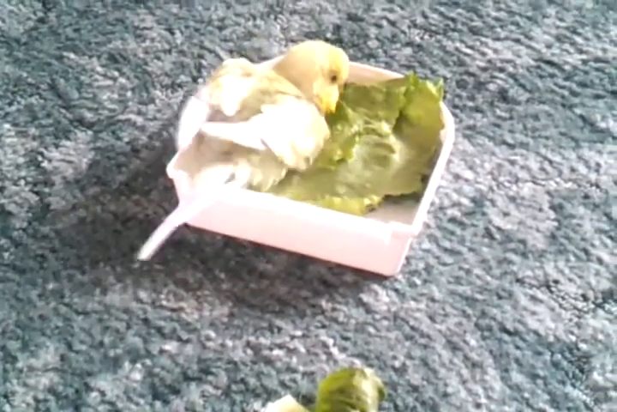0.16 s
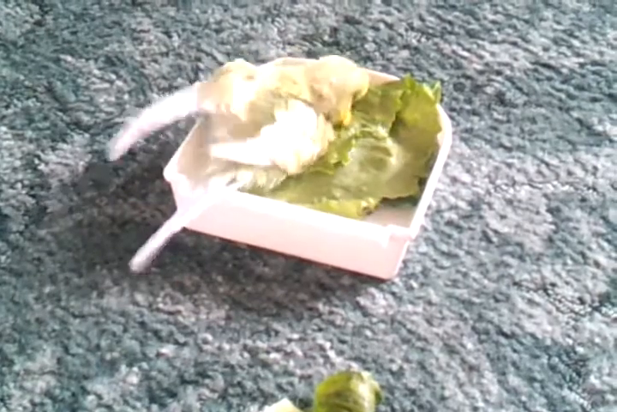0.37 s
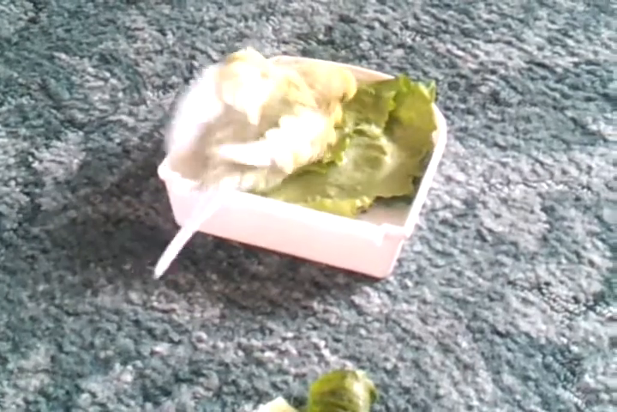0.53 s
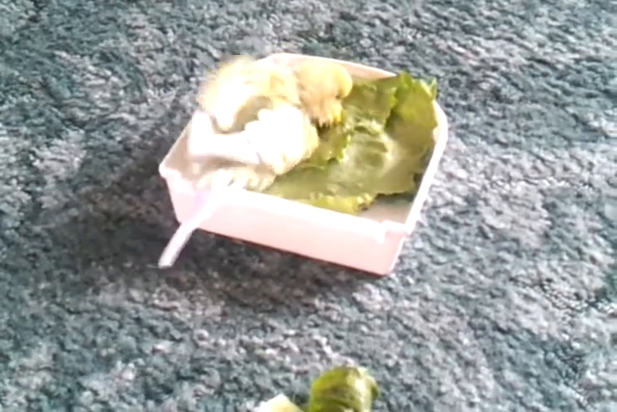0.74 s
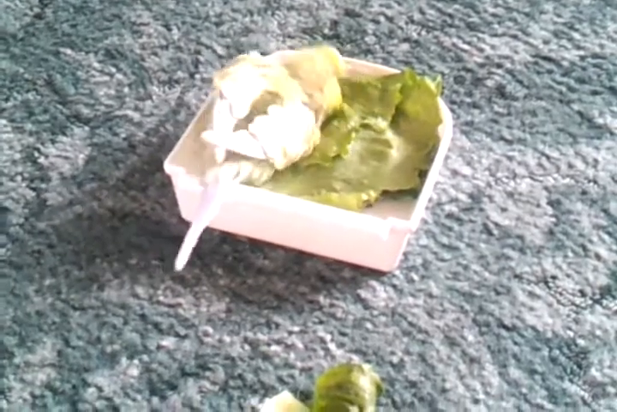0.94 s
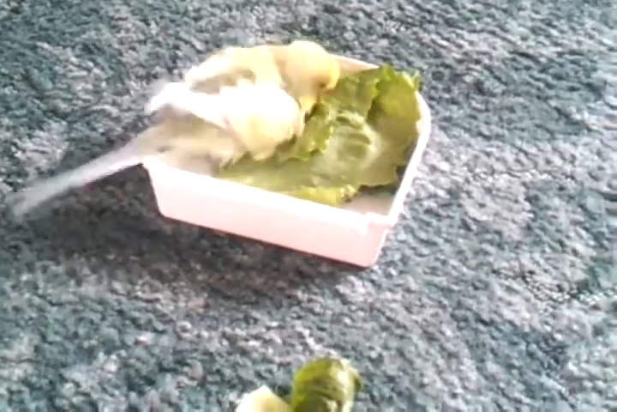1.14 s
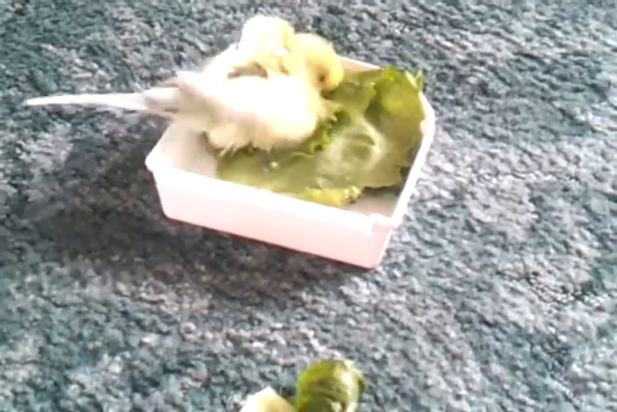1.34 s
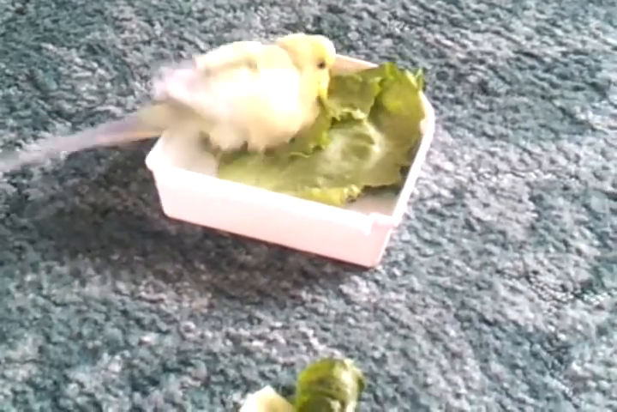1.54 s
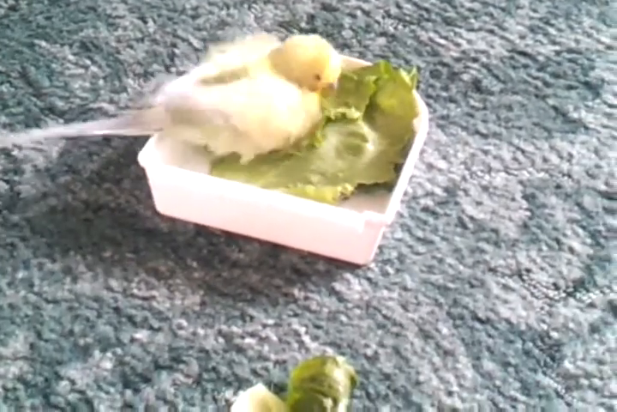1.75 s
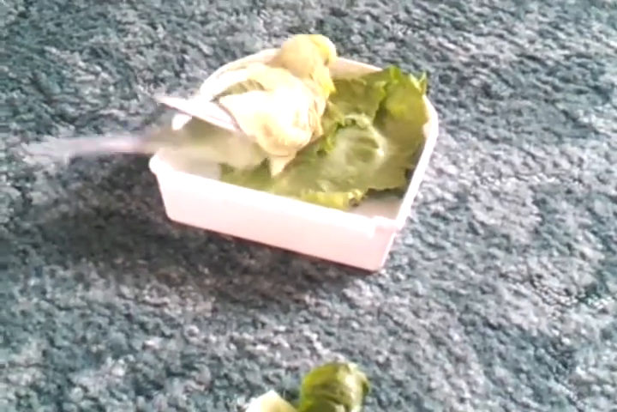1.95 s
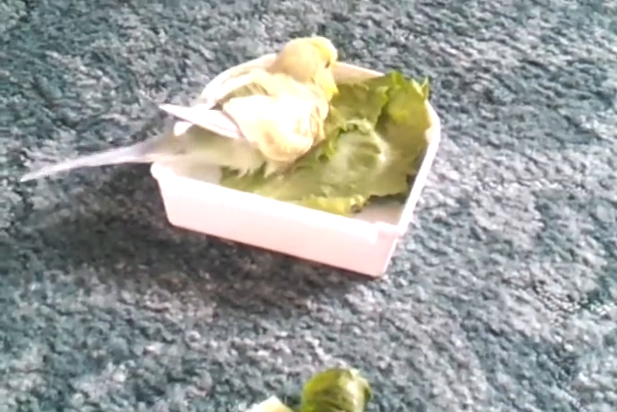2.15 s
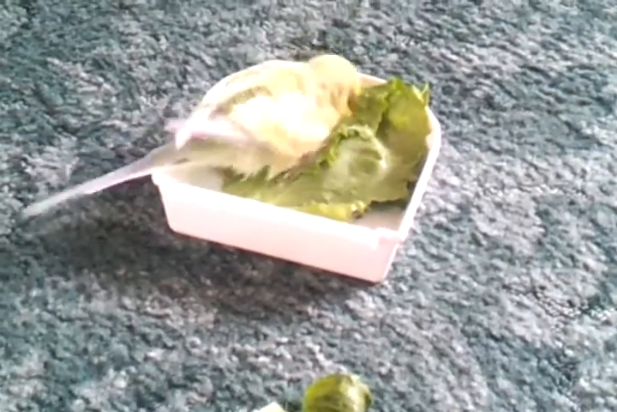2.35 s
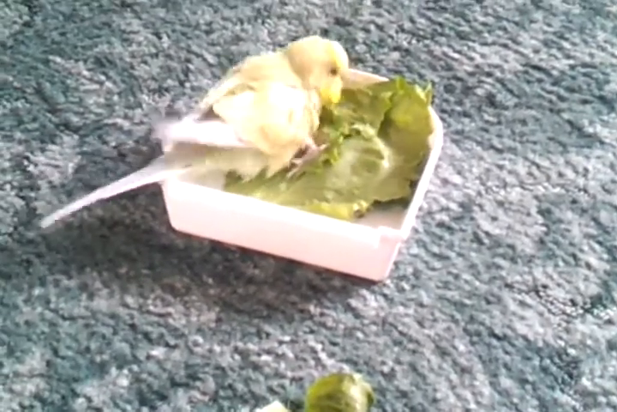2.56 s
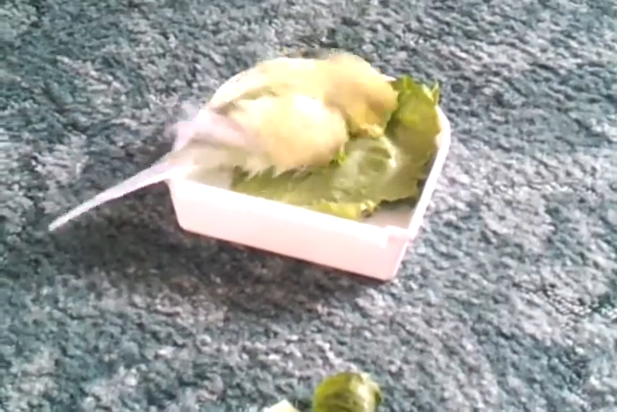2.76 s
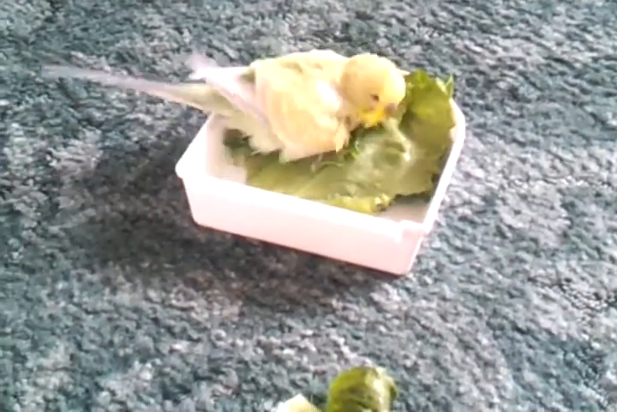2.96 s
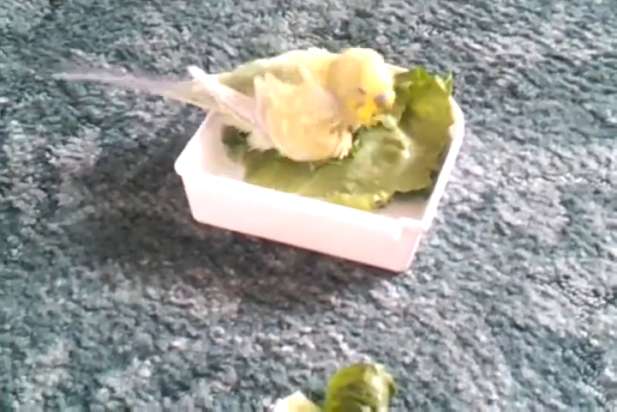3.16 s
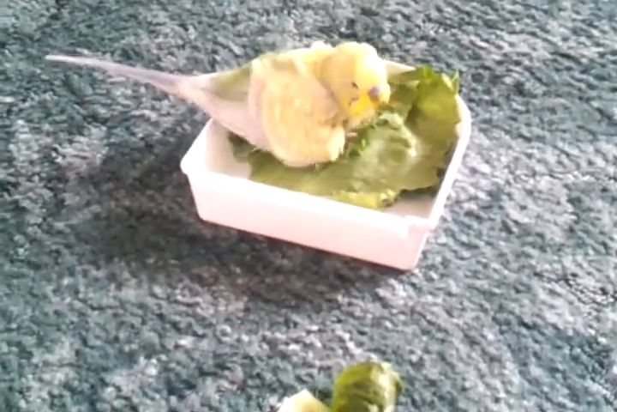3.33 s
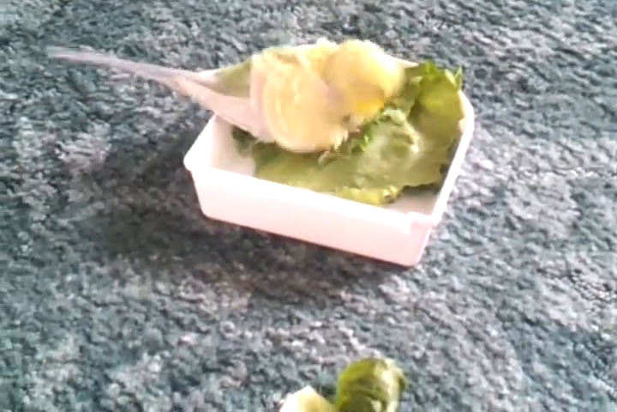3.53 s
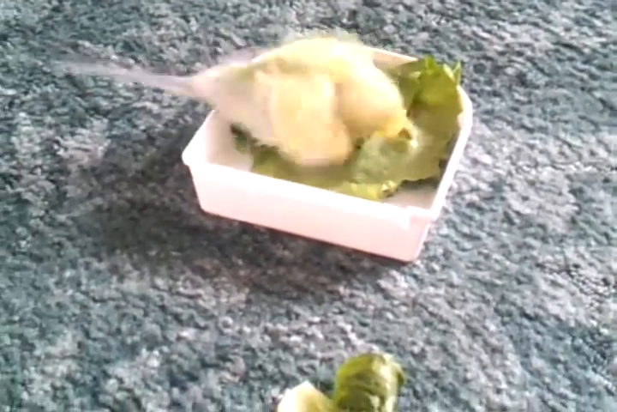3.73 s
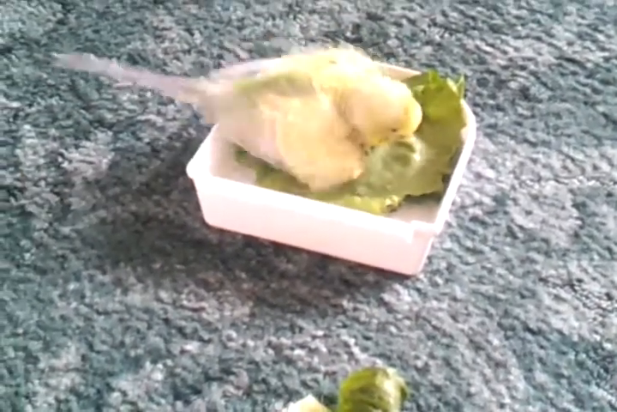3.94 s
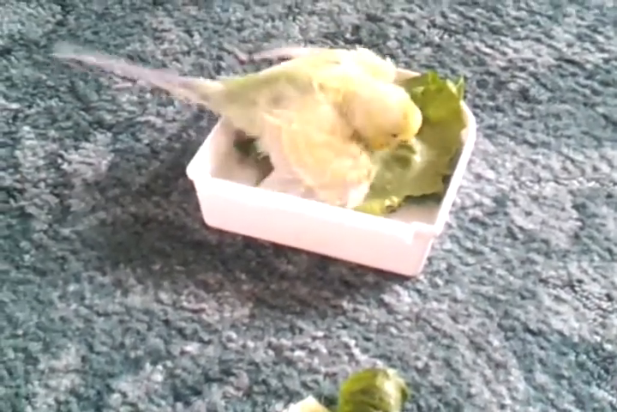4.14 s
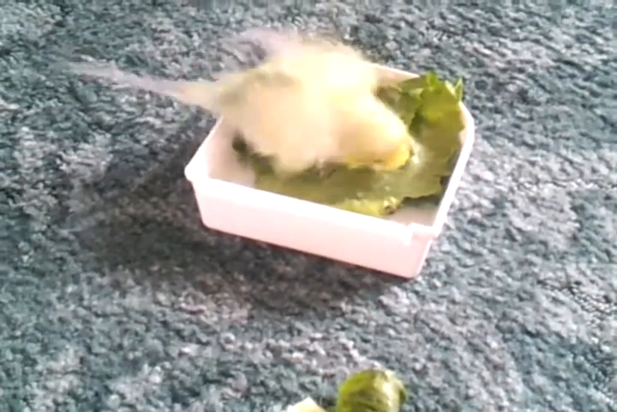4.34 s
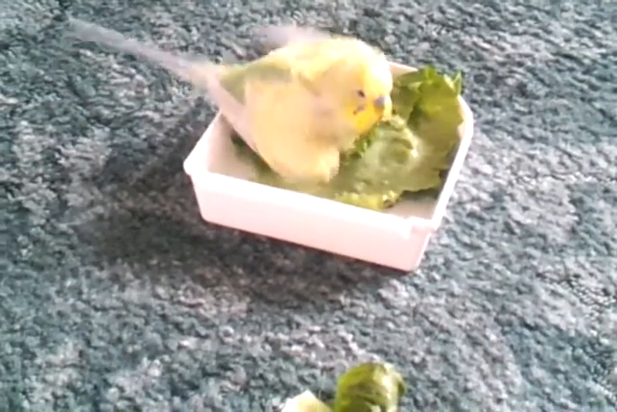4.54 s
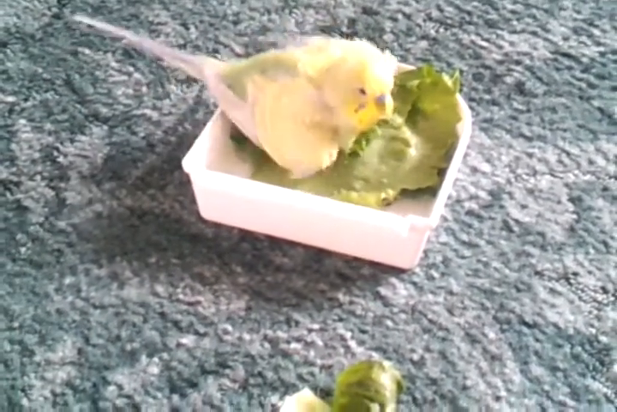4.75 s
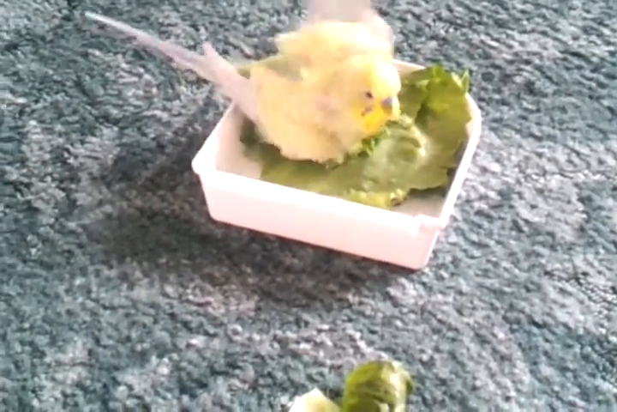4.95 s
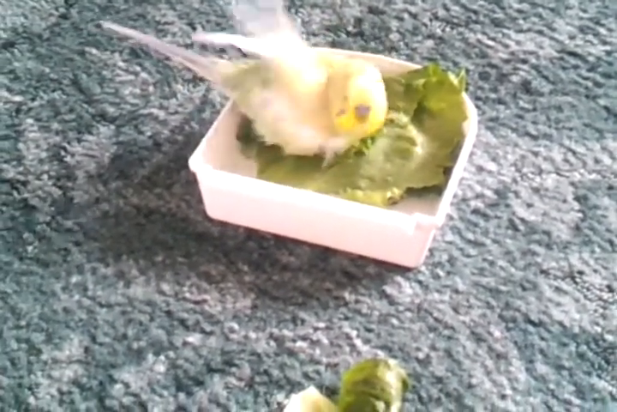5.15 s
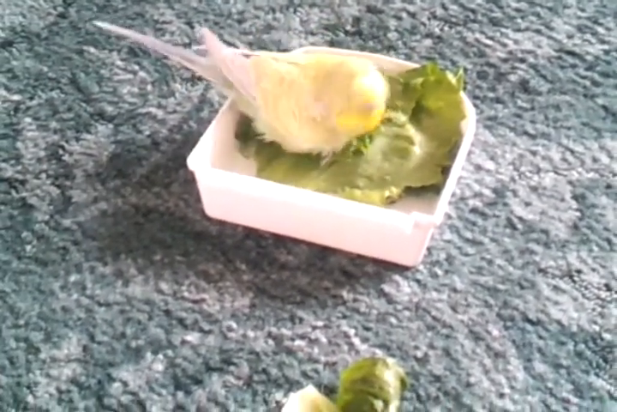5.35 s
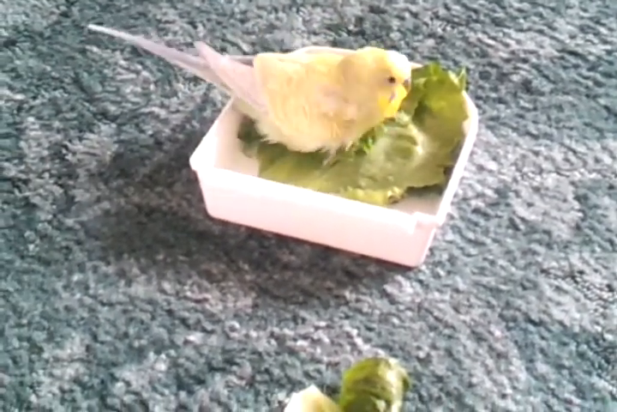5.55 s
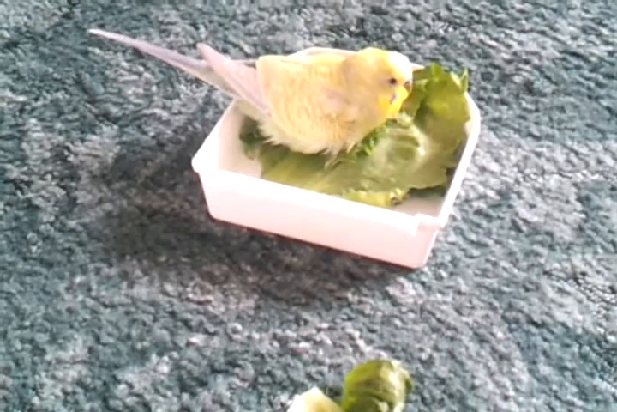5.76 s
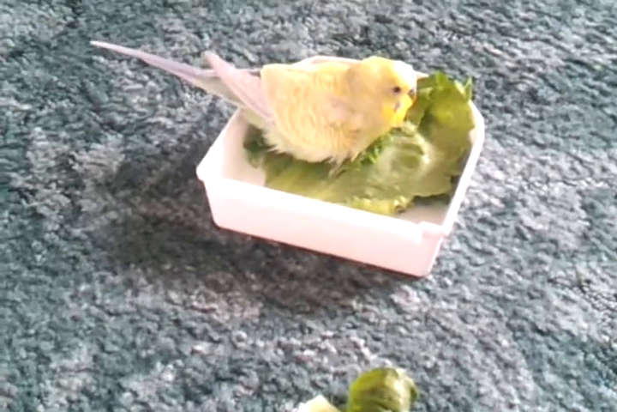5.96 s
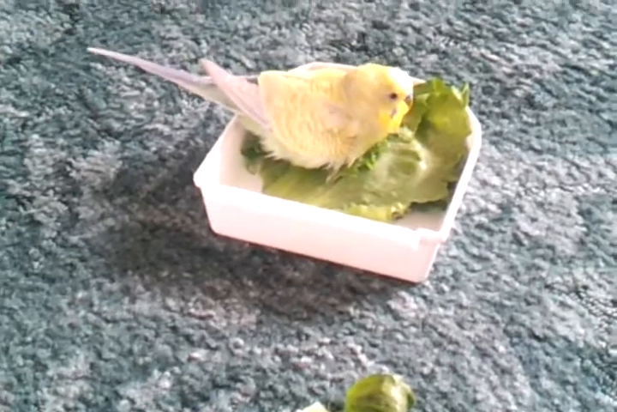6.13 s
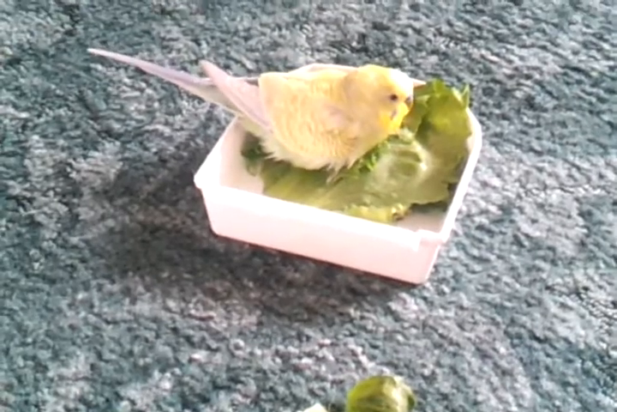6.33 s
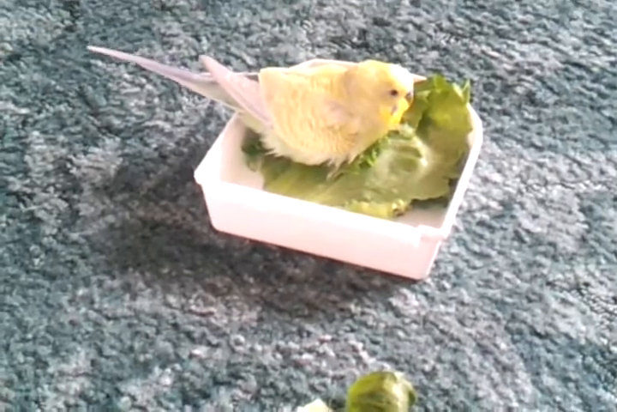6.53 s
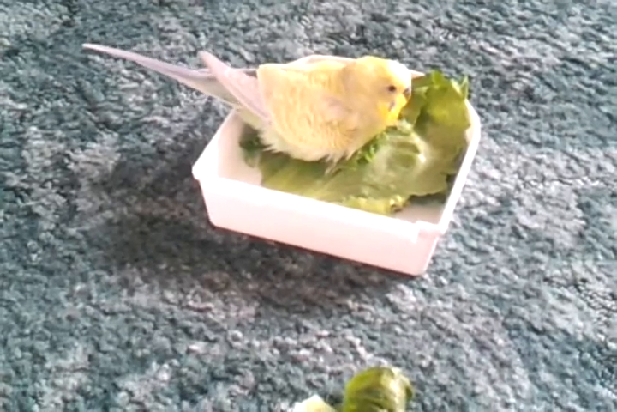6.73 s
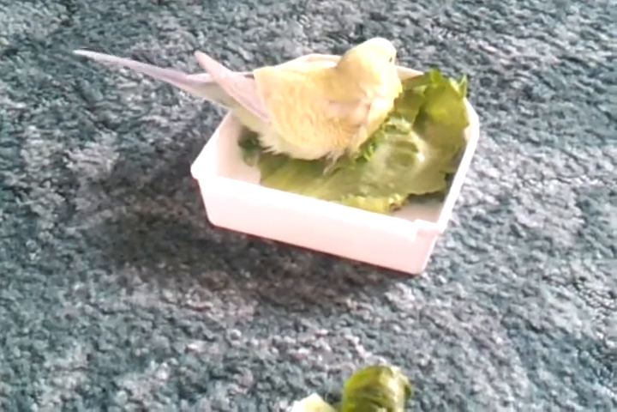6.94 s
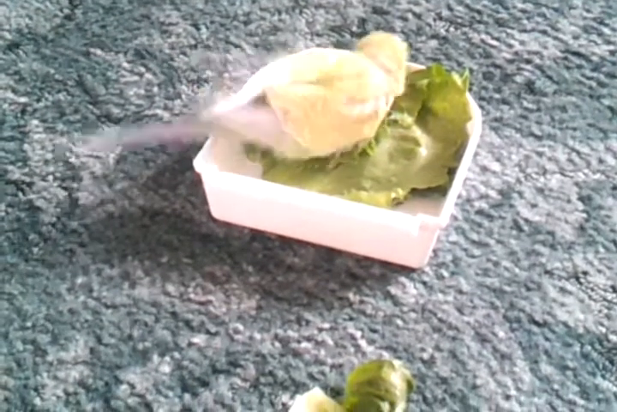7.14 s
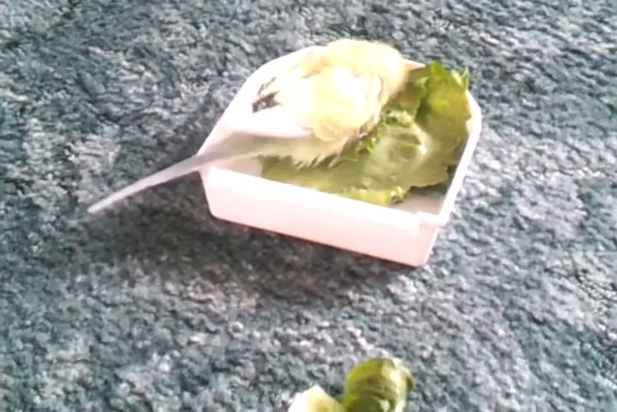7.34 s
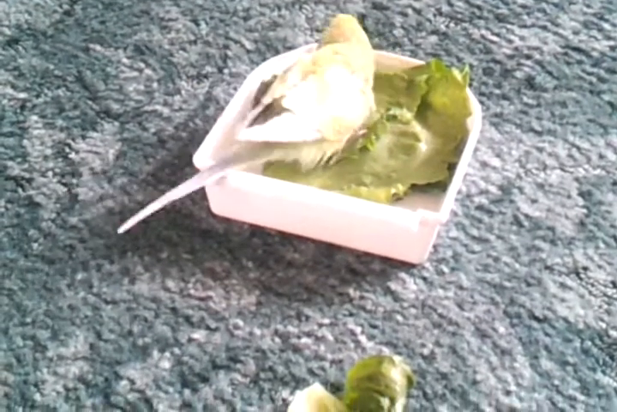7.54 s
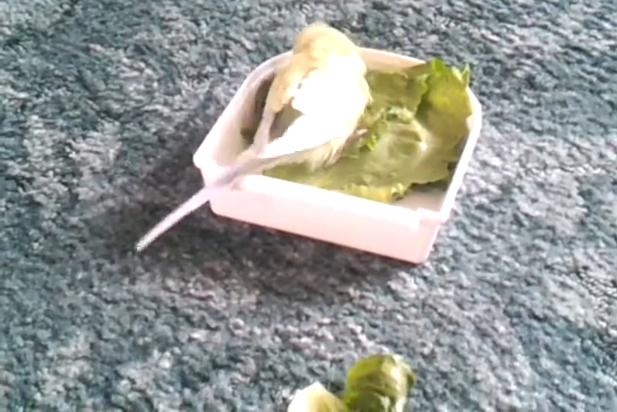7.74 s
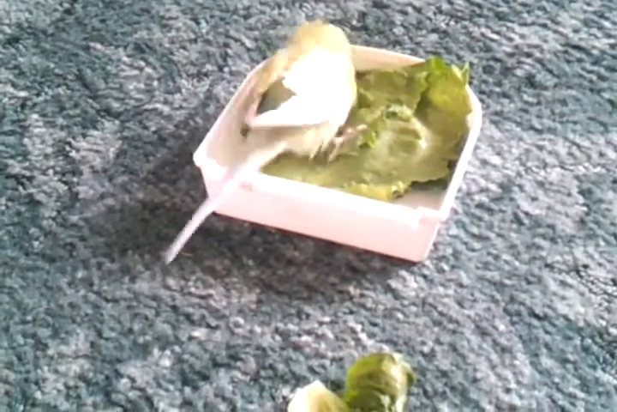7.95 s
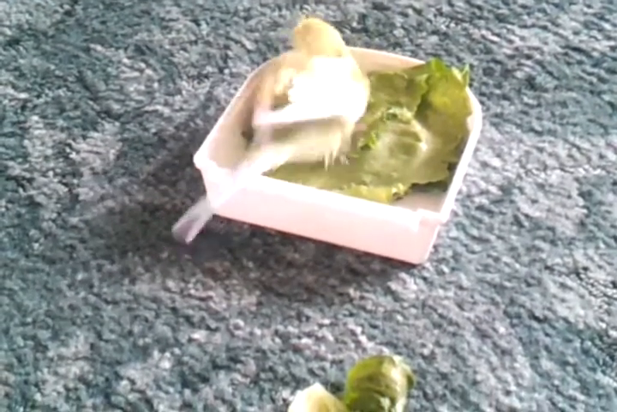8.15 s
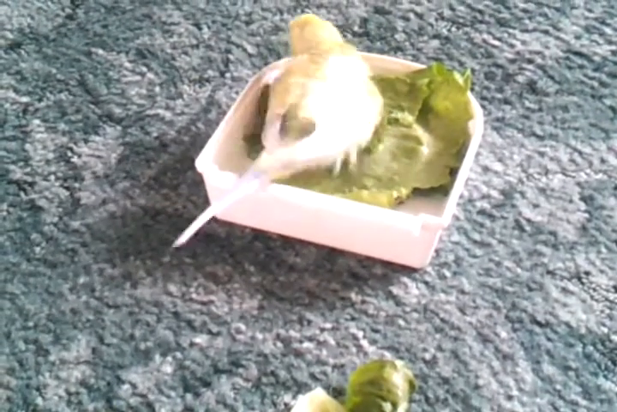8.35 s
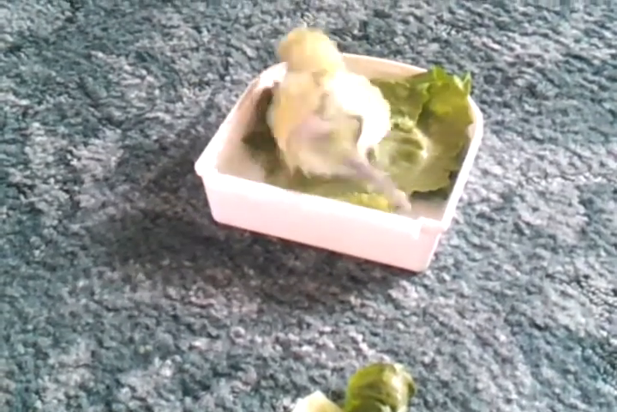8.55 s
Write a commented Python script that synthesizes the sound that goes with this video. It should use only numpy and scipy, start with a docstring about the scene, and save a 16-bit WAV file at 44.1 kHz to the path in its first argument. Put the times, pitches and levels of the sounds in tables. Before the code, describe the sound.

In a quiet room with a faint steady airy hiss, a budgie bathes on wet lettuce in a small plastic tub. Soft feather rustles come in short bouts with crisp ticks and pops. A loud, buzzy chirp sounds early on; wing shakes whirr and scuff around the middle, then it calms, and a second similar chirp comes near the end. Close microphone, slightly muted highest treble.

```python
"""In a quiet room, a steady noise of air, a budgie bathes on wet lettuce in a plastic tub.
Its feathers brush the leaves from the start, as clumped grains of noise; a loud buzzy chirp soon follows, a
whistle shaken by a slower vibration. Beak, claws and drops tick as cracks, pops and tub modes; low knocks join.
Towards the middle, shaken wings whirr and scuff as swelling noise and soft chucks fall in pitch as short tones;
near the end, the second loud chirp."""
import sys
import numpy as np
from scipy import signal
from scipy.fft import rfft, irfft, next_fast_len
from scipy.io import wavfile
from scipy.ndimage import uniform_filter1d

SR = 44100
rng = np.random.default_rng(int(sys.argv[2]) if len(sys.argv) > 2 else 0)


def store_pcm(level_fs):
    """Save levels as 16-bit WAV."""
    pcm = np.round(np.clip(level_fs, -1, 1) * 32767).astype(np.int16)
    wavfile.write(sys.argv[1], SR, np.atleast_2d(pcm).T)


N = 383229
TIME = np.arange(N) / SR


def from_db(db):
    """Decibels to gain."""
    return 10 ** (np.asarray(db) / 20)


def rms_one(x):
    """Scale to unit rms."""
    return x / np.sqrt(np.mean(x ** 2) + 1e-20)


def peak_one(x):
    """Scale to unit peak."""
    return x / np.abs(x).max()


def at_hz(points, hz):
    """Read a spectrum on a log-frequency axis."""
    f, db = np.transpose(points)
    return np.interp(np.log(np.maximum(hz, 1)), np.log(f), db)


def colour(x, points):
    """Filter a sound by a spectrum that falls away beyond its ends; rms 1."""
    size = next_fast_len(len(x))
    hz = np.maximum(np.fft.rfftfreq(size, 1 / SR), 1)
    low_end = np.minimum(hz / points[0][0], 1) ** 2
    high_end = np.minimum(points[-1][0] / hz, 1) ** 2
    gain = from_db(at_hz(points, hz)) * low_end * high_end
    return rms_one(irfft(rfft(x, size) * gain, size)[:len(x)])


def low_cut(x, hz):
    """Take away what lies below a frequency."""
    return signal.sosfilt(signal.butter(2, hz, "high", fs=SR, output="sos"), x + 1e-18)


def drift(t, rate):
    """Wander by chance along straight lines between random values, with a new value rate times a second."""
    knots = rng.standard_normal(4096)
    return np.interp((t - t[0]) * rate % 4095, np.arange(4096), knots)


def add(out, s, x):
    """Mix a short sound in at a time in seconds."""
    i = max(round(s * SR), 0)
    out[i:i + len(x)] += x[:N - i]


def dying(t, t60):
    """Envelope that loses 60 dB in t60 seconds."""
    return np.exp(-np.log(1000) * t / max(t60, 1e-4))


def mode(t, hz, t60):
    """A struck resonance: a sine that dies away exponentially."""
    return np.sin(2 * np.pi * hz * t) * dying(t, t60)


def swells(rows, rise_share):
    """Gain of movements that each swell up and fade, faster up than down if rise_share is below half."""
    power, rise = 0, np.clip(rise_share, .1, .5)
    for s, length, db in rows:
        width = 2 * length * np.where(TIME < s, rise, 1 - rise)
        power = power + from_db(db) ** 2 * np.exp(-np.pi * np.minimum(((TIME - s) / width) ** 2, 10))
    return np.sqrt(power)


def grains(per_s, spread_db, clump_db):
    """Countless tiny slips of uneven size that come in clumps."""
    born = rng.random(N) < per_s / SR
    uneven_db = spread_db * np.minimum(rng.exponential(1, N), 4)
    sizes = from_db(uneven_db + clump_db * drift(TIME, 70))
    return born * sizes * rng.choice([-1, 1], N)


def room(x, echo_db, tail_db, t60=.37, build_s=.012):
    """A few distinct reflections, and a diffuse tail that builds up and dies away."""
    # Walls and ceiling. Each row: delay in seconds, level in dB relative to echo_db.
    echoes = [(.0052, -26), (0.0101, -11), (.019, -7.5), (.037, -24.5), (0.052, -13)]
    t = np.arange(SR * 3 // 4) / SR
    tail = rng.standard_normal(len(t)) * dying(t, t60) * (1 - np.exp(-t / build_s))
    response = from_db(tail_db) * tail / np.sqrt(np.sum(tail ** 2))
    for delay, db in echoes:
        response[round(delay * SR)] += from_db(db + echo_db)
    return x + signal.fftconvolve(x, response)[:N]


def room_air(level_db=-57):
    """Steady room noise, random and weighted towards the lows."""
    # Spectrum of the room noise. Each row: frequency in Hz, relative level in dB per Hz.
    air_spectrum = [(12, -51.5), (20, -10.5), (70, -2.5), (122, -4), (175, -4.5), (250, -4.5), (291, -6),
                    (438, -6), (485, -7.5), (610, -8), (990, -10.5), (1690, -13), (1920, -14.5),
                    (6060, -17), (8880, -38.5), (11500, -81), (19500, -120)]
    return from_db(level_db) * colour(rng.standard_normal(N), air_spectrum)


def rubbing_gain():
    """Course of the rubbing: bouts that swell quickly and fade more slowly."""
    # Bouts of feathers on leaves. Each row: strongest moment in seconds, length in seconds, relative level in dB.
    bouts = [(.06, .06, -61), (.22, .1, -60), (.66, .1, -53.5), (1.15, .035, -52.5), (1.195, .04, -55),
             (1.422, .022, -52), (1.608, .033, -57), (1.86, .19, -61), (2.455, .025, -55),
             (2.505, .033, -52), (2.854, .16, -60.5), (3.441, .025, -57.5), (3.62, .07, -58.5),
             (3.83, .2, -57.5), (4.11, .035, -54), (4.32, .06, -60), (4.425, 0.056, -48), (4.72, .26, -58),
             (4.906, .033, -48.5), (5.08, .1, -58), (6.786, .05, -61), (7.312, .015, -56.5),
             (7.38, .06, -62), (8.16, .08, -60.5), (8.52, 0.067, -61)]
    return swells(bouts, rise_share=0.23)


def rustle(rubbing, swish_db=-1.0, strokes_per_s=45, stroke_swing_db=1.6):
    """Feather barbs slip over the wet leaves in uneven strokes."""
    # Colour of feather on leaf. Each row: frequency in Hz, level in dB.
    swish = [(1000, -22), (2000, -11.5), (3300, -4.5), (4800, -5), (7000, 1), (8000, -22), (9000, -18)]
    strokes = from_db(swish_db + stroke_swing_db * drift(TIME, strokes_per_s))
    return rubbing * strokes * colour(grains(per_s=2400, spread_db=2.5, clump_db=3.5), swish)


def small_ticks(rubbing, count=64, level_db=-46, spread_db=1.6, pop_hz=5180, dull_db=-13, pop_db=-11):
    """Rows of faint ticks at chance moments, likelier where the bird rubs harder."""
    chance, scatter = rng.random(count), rng.standard_normal((count, 2))
    times = np.searchsorted(np.cumsum(rubbing) / rubbing.sum(), chance) / SR
    return [(s, level_db + spread_db * size, pop_hz * 2 ** (.25 * tune), dull_db, pop_db)
            for s, (size, tune) in zip(times, scatter)]


def ticks(rubbing, tub_db=-3, crumple_db=-25, crumple_t60=0.17, pop_s=0.00051, lowest_hz=650):
    """A crack with a brief bright pop; the tub answers dully and the leaf crackles as it settles."""
    # Beak, claws and drops on leaf and tub. Each row: start in seconds, level in dB, frequency in Hz
    # from which the pop rises, relative level of the tub in dB, pop over crack in dB.
    main_ticks = [(.683, -29, 2450, -19, -8), (.6914, -28.5, 5100, -10, -3), (.7104, -38, 4500, -12, 3),
                  (.7342, -36, 4380, -17, 4), (.7622, -37, 4100, -22, 7), (.8952, -39.5, 5040, -22, 7),
                  (1.1967, -21, 4720, -42, 21), (1.6025, -40, 4740, -10, -4), (1.613, -36.5, 2450, -10, -1),
                  (1.6921, -35.5, 4330, -25, 7), (2.4187, -37, 2650, -5, -2),
                  (2.4949, -28.5, 5370, -30, -6), (2.5192, -41, 5000, -20, -8),
                  (3.8382, -35, 5230, -6, -13), (4.021, -32, 6560, -8, -12), (4.099, -26.5, 6550, -9, -3.5),
                  (4.4087, -19.5, 4560, -4, -22), (4.4262, -30, 5130, -27, -14),
                  (4.4466, -31, 6300, -8, -7), (4.5811, -26.5, 4100, -20, -9),
                  (4.6253, -23.5, 3600, -12, -9), (4.7009, -27, 4000, -4, -16.5),
                  (4.7653, -29.5, 6830, -9, -7), (4.899, -31, 4050, -21, 11), (5.1227, -37.5, 3260, -2, 1),
                  (8.5014, -35, 3520, -24, 0), (8.5074, -37, 5230, -17, 4)]
    # Colour of crack and crackle. Each row: frequency in Hz, level in dB.
    crack_colour = [(1500, -13), (2600, 1.5), (3500, -8), (4600, 7.5), (7000, 1), (8500, -14)]
    # Tub resonances before chance detuning and scatter.
    # Each row: frequency in Hz, level in dB, time to lose 60 dB in seconds.
    tub_modes = [(890, 3, .014), (1430, -13, 0.011), (1670, 12, 0.012), (2140, 7, 0.014)]
    out, t = np.zeros(N), np.arange(SR // 10) / SR
    for s, db, hz, dull_db, ring_db in list(main_ticks) + small_ticks(rubbing):
        crack = peak_one(colour(rng.standard_normal(len(t)), crack_colour) * dying(t, .007))
        # a tiny wet cavity opens: its ring swells within a few cycles and rises in pitch
        pop_swell = t / pop_s * np.exp(1 - t / pop_s)
        pop = np.sin(2 * np.pi * hz * t * (1 + 25 * t)) * pop_swell
        tub = 0
        for mode_hz, mode_db, t60 in tub_modes:
            mode_gain = from_db(mode_db + rng.normal(0, 1.8)) * rng.choice([-1, 1])
            tub = tub + mode_gain * mode(t, mode_hz * rng.uniform(0.98, 1.05), t60)
        crackle = rng.standard_normal(len(t)) ** 3   # cubing makes it spiky
        crumple = colour(crackle, crack_colour) * dying(t, crumple_t60)
        hit = peak_one(crack + from_db(ring_db) * pop + from_db(tub_db + dull_db) * peak_one(tub))
        # a tick that is mostly pop leaves less crackle
        settling = from_db(crumple_db) * crumple / np.hypot(1, from_db(ring_db))
        add(out, s, from_db(db) * (hit + settling))
    return low_cut(out, lowest_hz)


def syrinx(t, pitch, buzz, doubling, slope_db, buzz_ratio=.2, throb=0.55, hiss_db=-12):
    """A whistle with overtones, shaken into a buzz by a slower vibration; a slack membrane adds the octave below."""
    # Throat and beak. Each row: frequency in Hz, level in dB.
    throat = [(900, -6.5), (1500, -11.5), (2400, 6.5), (3300, 1.5), (3750, -10), (4500, -19.5), (5300, -4),
              (5750, -16), (6300, -5.5), (6950, -3.5), (8000, -22.5)]
    shake = 2 * np.pi * np.cumsum(buzz_ratio * pitch * (1 + .15 * drift(t, 350))) / SR
    waver = .026 * drift(t, 150) + .045 * buzz * drift(t, 900)
    hz = pitch * (1 + .13 * buzz * np.sin(shake) + waver)
    phase = 2 * np.pi * np.cumsum(hz) / SR
    source = from_db(hiss_db) * rng.standard_normal(len(t))   # turbulence in the airflow
    for k in range(1, 4):
        octave_below = doubling * np.sin((k - .5) * phase)
        source = source + from_db(slope_db * np.log2(k)) * (np.sin(k * phase) + octave_below)
    tone = colour(source, throat)
    tone = tone / np.sqrt(uniform_filter1d(tone ** 2, size=180) + 1e-9)   # equally strong at every pitch
    depth = np.clip(buzz * throb, 0, 1)
    return tone * (1 + depth * np.cos(shake + 0.28)) / np.sqrt(1 + depth ** 2 / 2)


def chirps(most_buzz=0.89, slack_buzz=0.52, slack_doubling=1.2):
    """Each chirp flips between clear high and buzzy low notes, peaks in two pushes, then drops into a low rasp."""
    # The same chirp twice. Each row: start in seconds, level in dB added to the course, swell towards its end in dB,
    # depth of its pitch dips (1 = usual), buzz of its high notes (0 to 1),
    # pitch lift at the pushes in Hz, width of a push in seconds.
    chirp_rows = [(.472, -0.86, -1, 1.04, 0.09, -110, 0.0023), (7.7275, -1.5, 5, .94, 0.3, 109.5, 0.0018)]
    # Shared course of a chirp. Each row: seconds from its start, pitch in Hz at usual depth before the lift,
    # relative level in dB before the pushes.
    chirp_shape = [(0, 2556, -59.5), (.013, 3097, -42), (.026, 2852, -52), (0.036, 2304, -37),
                   (.043, 3202, -31), (.065, 3046, -38.5), (0.071, 2374, -33), (.09, 2566, -39.5),
                   (.094, 3292, -33), (.121, 3211, -24.5), (.127, 2786, -31), (.152, 2350, -31.5),
                   (.158, 1771, -37.5), (.18, 1697, -42)]
    taut_hz, buzz_per_hz = 3185, 0.00079   # clear when high, buzzier as the pitch dips
    slack_hz, slack_range_hz = 2310, 428   # below this the octave underneath comes in
    start_doubling, settle_s = 10, 0.0096   # it also sounds while the membrane first tightens
    # two sharp pushes at the top of the chirp, inside a brief bend of the pitch
    push_s, push_gap_s, push_db, lift_s = .1138, 0.008, 8, 0.01217
    # the voice turns harsh just before the pushes, which stay clear
    strain_buzz, strain_from_s, strain_rise_s = 0.44, .102, 0.0024
    # overtones in dB per octave: they brighten through the opening notes, dull once harsh
    clear_slope_db, dull_slope_db, brighten_s = -1.5, -10.5, .04
    release_s = .007

    out = np.zeros(N)
    s, *columns = np.transpose(chirp_shape)
    t = np.arange(0, s.max(), 1 / SR)
    course_hz, course_db = [np.interp(t, np.sort(s), c) for c in columns]
    strain = np.clip((t - strain_from_s) / strain_rise_s, 0, 1)
    clearness = np.minimum(t / brighten_s, 1) * (1 - strain)
    slope_db = dull_slope_db + (clear_slope_db - dull_slope_db) * clearness
    bend = np.exp(-((t - push_s - push_gap_s / 2) / lift_s) ** 2)
    release = np.minimum((t[-1] - t) / release_s, 1)
    for start, db, swell_db, depth, high_buzz, lift_hz, width in chirp_rows:
        pushes = sum(np.exp(-((t - push_s - k * push_gap_s) / width) ** 2) for k in range(2))
        pitch = taut_hz + depth * (course_hz - taut_hz) + lift_hz * bend
        slack = np.clip((slack_hz - pitch) / slack_range_hz, 0, 1)
        buzz = high_buzz + strain_buzz * strain * (1 - pushes) + buzz_per_hz * (taut_hz - pitch)
        buzz = np.clip(buzz, 0, most_buzz) * (1 - slack) + slack_buzz * slack
        doubling = slack_doubling * slack ** 2 + start_doubling * np.exp(-t / settle_s)
        gain = release * from_db(db + course_db + swell_db * t / t[-1] + push_db * pushes)
        add(out, start, gain * syrinx(t, pitch, buzz, doubling, slope_db))
    return out


def bumps(lowest_hz=70):
    """Heavily damped low knocks, little more than one cycle."""
    # Dull bumps. Each row: start in seconds, level in dB, frequency in Hz, time to lose 60 dB in seconds.
    knocks = [(2.091, -37, 263, 0.0073), (2.173, -33, 137, 0.012), (3.36, -35, 137, 0.016)]
    out, t = np.zeros(N), np.arange(SR // 10) / SR
    for s, db, hz, t60 in knocks:
        add(out, s, from_db(db) * peak_one(mode(t, hz, t60)))
    return low_cut(out, lowest_hz)


def wing_shake(scuff_db=-1):
    """Shaken wings whirr in the air, a low noise, and scuff the tub in grains."""
    # Wing shakes. Each row: strongest moment in seconds, length in seconds, whirr in dB,
    # scuffing on the tub in dB relative to scuff_db.
    shakes = [(3.844, 0.061, -60, -58), (4.102, 0.12, -63, -66), (4.44, 0.049, -53, -50),
              (4.81, 0.1, -54.5, -62), (5.02, 0.14, -57, -55)]
    # Colour of the whirr. Each row: frequency in Hz, level in dB.
    whirr_colour = [(150, -11.5), (225, -10), (268, -4), (310, -9), (420, -16)]
    # Colour of the scuffing. Each row: frequency in Hz, level in dB.
    scuff_colour = [(800, -5.5), (1200, -7), (1400, 0), (1700, -11.5), (2300, -8.5), (3500, -28)]
    beating = swells([(s, length, db) for s, length, db, _ in shakes], rise_share=0.33)
    scuffing = swells([(s, length, db) for s, length, _, db in shakes], rise_share=0.5)
    whirr = beating * colour(rng.standard_normal(N), whirr_colour)
    slips = grains(per_s=4000, spread_db=2.0, clump_db=1.5)
    return whirr + from_db(scuff_db) * scuffing * colour(slips, scuff_colour)


def chucks(rough=0.09, overtone_db=-13):
    """Very short falling notes, muffled and unsteady."""
    # Soft chucks with a closed beak. Each row: start in seconds, middle pitch in Hz, level in dB,
    # length in seconds, fall of the pitch as a share.
    chuck_rows = [(4.897, 1560, -41, 0.0105, .26), (5.568, 1620, -50, .0094, 0.26),
                  (5.932, 1630, -56.5, 0.011, .23), (7.053, 1477, -54.5, 0.0166, 0.22),
                  (8.517, 1760, -48, 0.0098, 0.11)]
    out = np.zeros(N)
    for s, hz, db, length, fall in chuck_rows:
        t = np.arange(0, length, 1 / SR)
        pitch = hz * (1 + fall * (.5 - t / length) + rough * drift(t, 750))
        phase = 2 * np.pi * np.cumsum(pitch) / SR
        note = np.sin(phase) + from_db(overtone_db) * (np.sin(2 * phase) + np.sin(3 * phase))
        add(out, s, from_db(db) * np.sin(np.pi * t / length) * rms_one(note))
    return out


def scene():
    """Voice and bathing sounds in the room, with dry bumps, over its steady noise."""
    voice = room(chirps(), echo_db=0.5, tail_db=-8.5) + room(chucks(), echo_db=-4.5, tail_db=-1.5)
    rubbing = rubbing_gain()
    bathing = ticks(rubbing) + rustle(rubbing) + wing_shake()
    bathing = room(bathing, echo_db=-16, tail_db=-17)
    return (voice + bathing + bumps() + room_air())[None]


def record(dry, soft_top_hz=7600, cutoff_hz=8900):
    """The treble rolls off, then is cut."""
    soft = signal.sosfilt(signal.butter(8, soft_top_hz, fs=SR, output="sos"), dry)
    return signal.sosfilt(signal.ellip(10, .2, 80, cutoff_hz, fs=SR, output="sos"), soft)


dry = scene()
out = record(dry)
store_pcm(out)
```